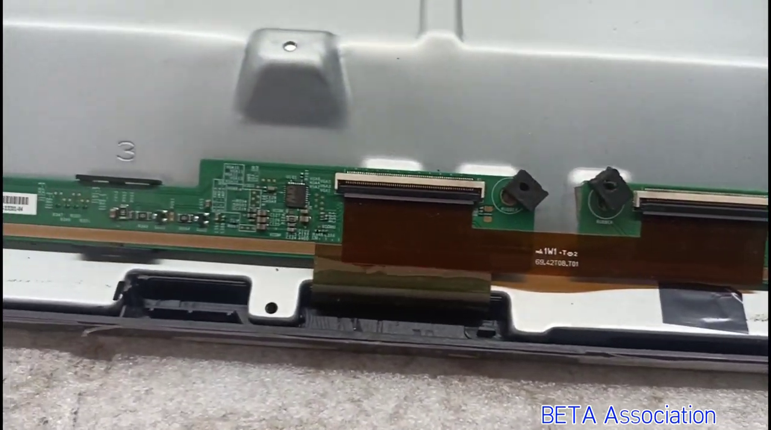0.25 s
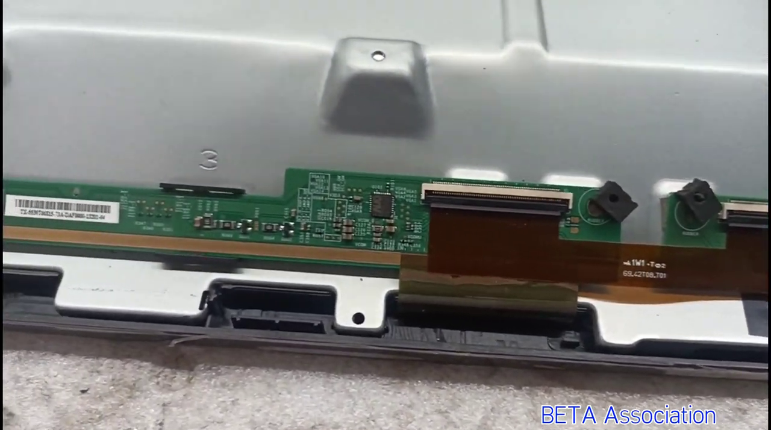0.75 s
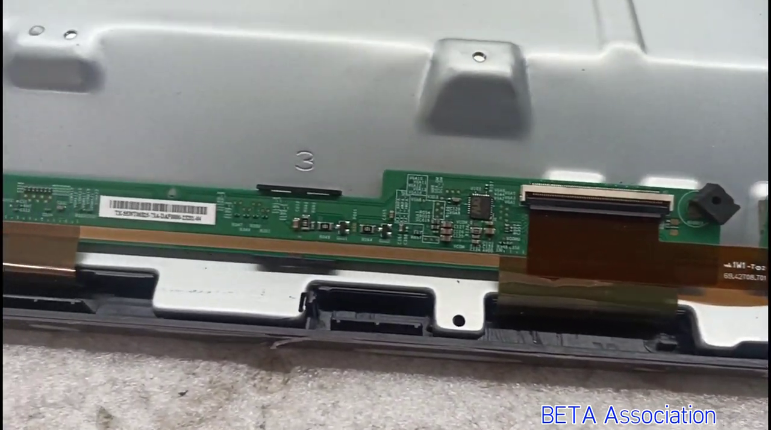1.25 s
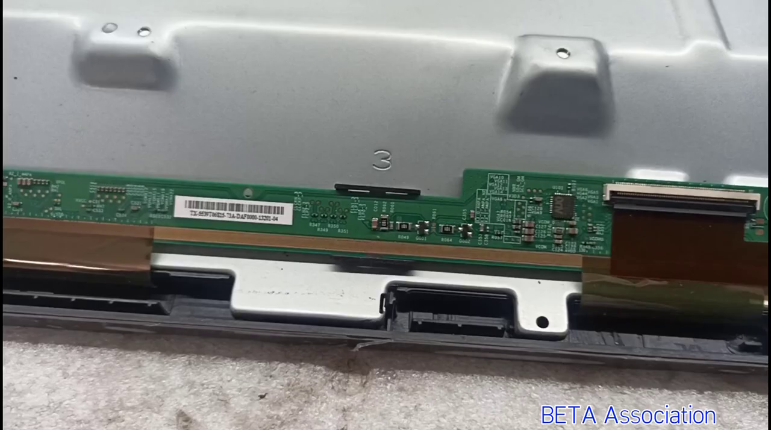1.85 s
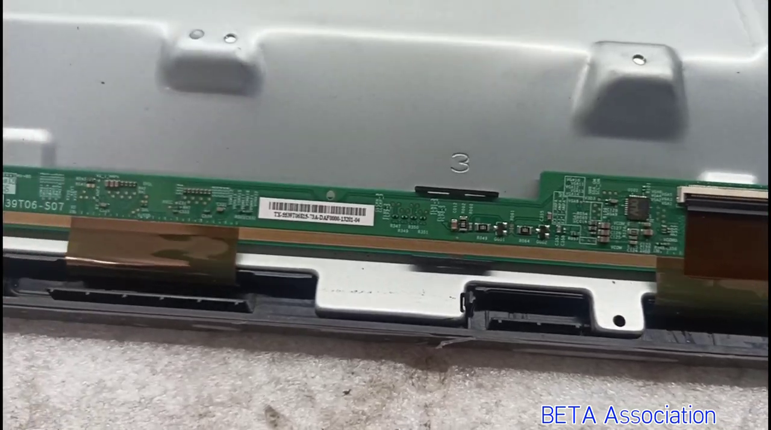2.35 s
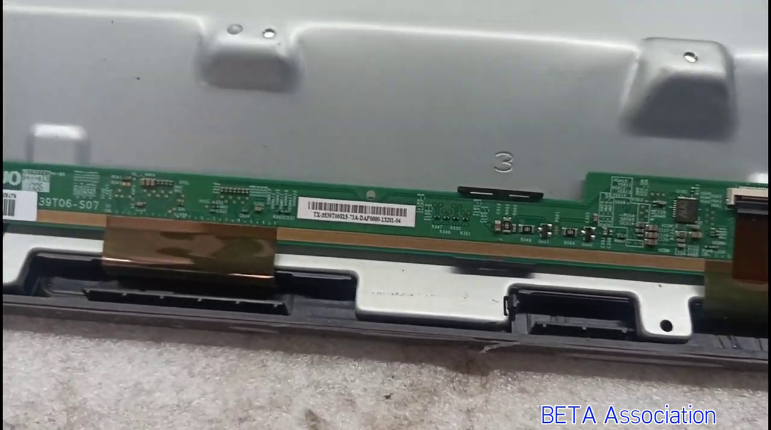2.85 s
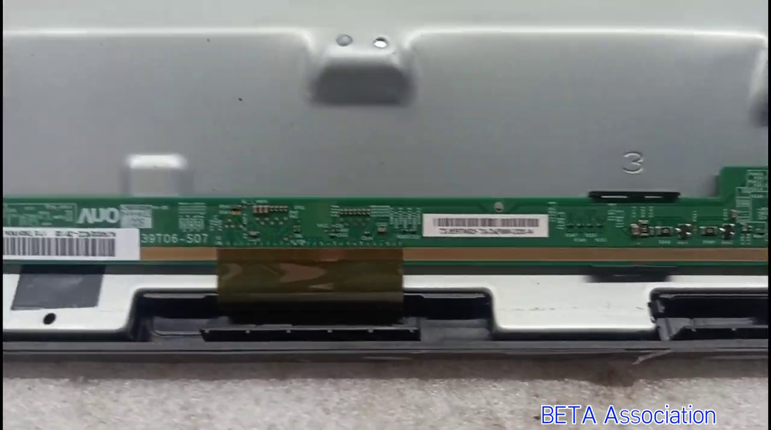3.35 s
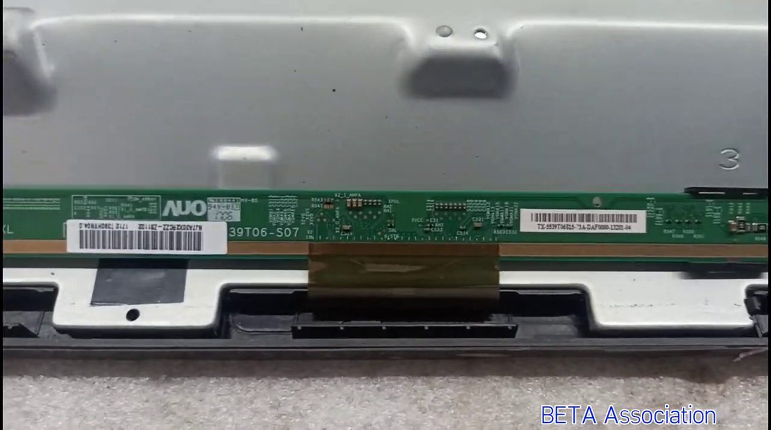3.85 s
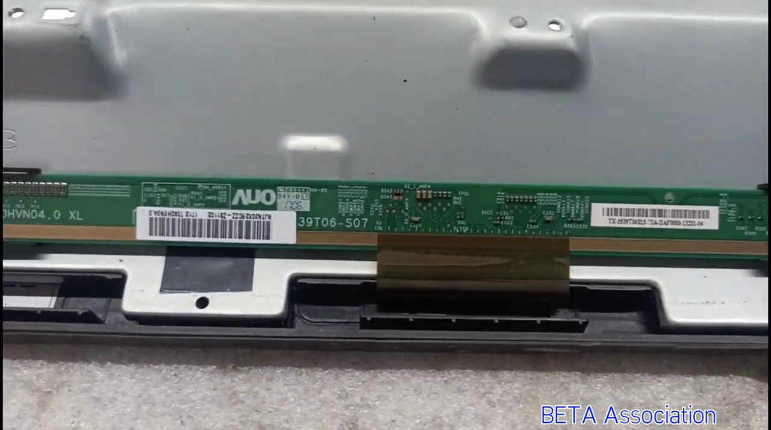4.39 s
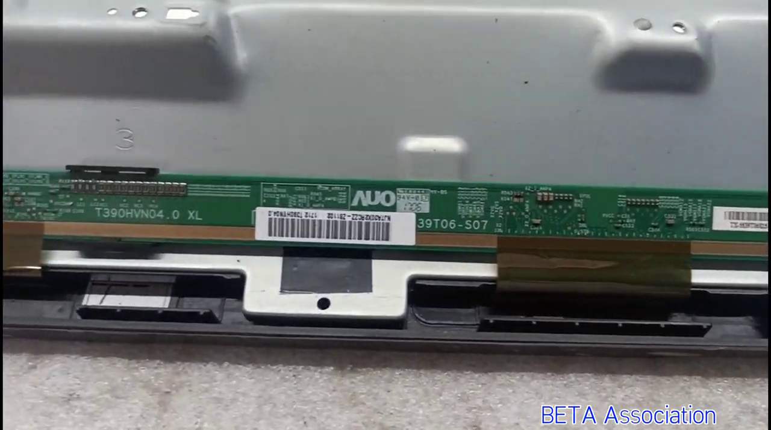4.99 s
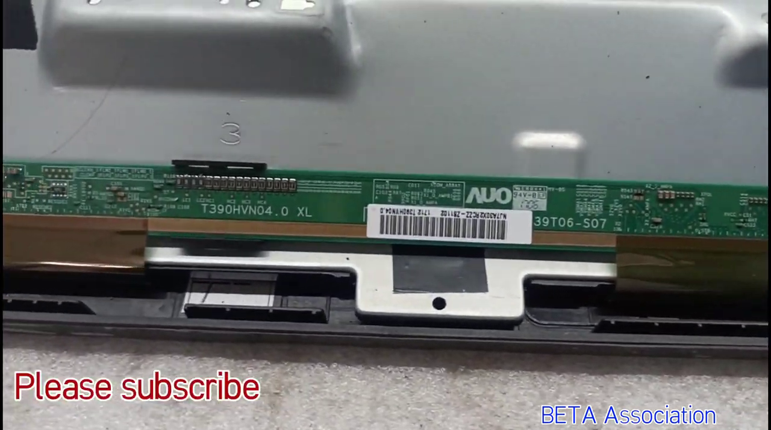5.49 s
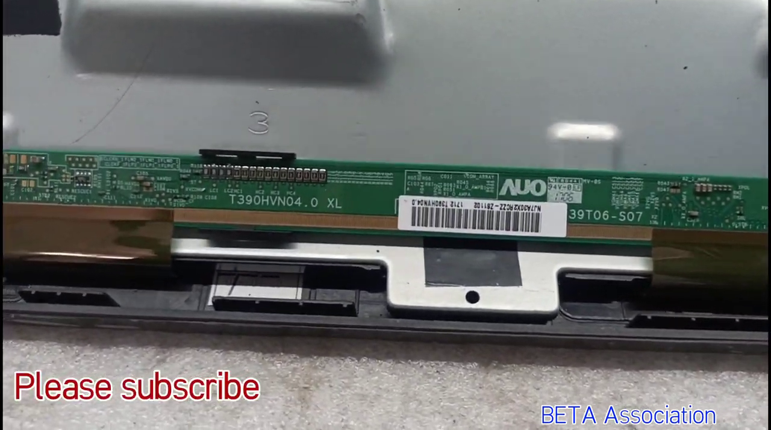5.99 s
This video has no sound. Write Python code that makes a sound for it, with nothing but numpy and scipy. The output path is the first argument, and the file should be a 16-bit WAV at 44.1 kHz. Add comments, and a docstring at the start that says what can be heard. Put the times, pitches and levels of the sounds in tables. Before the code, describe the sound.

In a quiet workshop, a heavy vehicle's low wavering drone comes from outside with dull roar and road rush, gradually drawing away. Within the first second a lighter vehicle passes, its tyre noise swelling and its motor note sinking slightly. Around three seconds something rustles close to the microphone with tiny ticks. Faint hiss fills the room, and one small soft tap comes near the end.

```python
"""A heavy engine drones past outside a quiet workshop and slowly draws away: sines on multiples of one
cycle rate swell and fade over a throbbing roar and road rush made of shaped noise.
A lighter vehicle passes early on, as a few sinking orders and tyre noise; a broad noise hiss fills the room.
Close by something rustles briefly (swells of grainy noise) and a few small ticks sound (damped rings)."""
import sys
import numpy as np
from scipy import signal
from scipy.fft import rfft, irfft, next_fast_len
from scipy.io import wavfile
from scipy.ndimage import uniform_filter1d, map_coordinates

SR = 44100
rng = np.random.default_rng(int(sys.argv[2]) if len(sys.argv) > 2 else 0)


def int16_out(signal):
    """Quantize to a 16-bit WAV file."""
    q = np.round(np.clip(np.atleast_2d(signal).T, -1, 1) * 32767)
    wavfile.write(sys.argv[1], SR, q.astype(np.int16))


N = 274743  # samples
TIME_S = np.arange(N) / SR


def amp(db):
    """Level to amplitude: 20 dB is a factor of ten."""
    return 10 ** (np.asarray(db) / 20)


def unit(x):
    """Normalisation to a root mean square of 1."""
    return x / np.sqrt(np.mean(x ** 2) + 1e-20)


def along(points, hz):
    """Interpolation of (f/Hz, value) points on a logarithmic frequency axis."""
    f, v = np.transpose(points)
    return np.interp(np.log(hz + 1), np.log(f + 1), v)


def curves(rows):
    """Linear interpolation in time: one value per sample for each column after t/s."""
    s, *columns = np.transpose(rows)
    return [np.interp(TIME_S, s, column) for column in columns]


def wobble(rate):
    """Band-limited random modulation: a smooth curve through `rate` random knots a second."""
    knots = rng.standard_normal(int(N * rate / SR) + 4)
    return map_coordinates(knots, [np.arange(N) * rate / SR])


def filtered(x, response):
    """Linear filtering: the spectrum of x times a response of frequency."""
    m = next_fast_len(N + 8192)  # zero padding
    return irfft(rfft(x, m) * response(np.fft.rfftfreq(m, 1 / SR)), m)[..., :N]


# Interchannel coherence of every noise: (f/Hz, left-right likeness)
LIKENESS = [(60, 0.87), (180, 0.99), (550, 0.76), (1650, 0.035), (4970, 0.01), (15000, 0.11)]


def noise(spectrum, patchy_db):
    """Partly coherent stereo noise of rms 1: spectral shaping, with random gain over time and frequency."""
    z = signal.stft(rng.standard_normal((2, N)), nperseg=512)[2]
    field = uniform_filter1d(rng.standard_normal(z.shape[1:]), size=6, axis=0)
    field = uniform_filter1d(field, size=12, axis=1)
    pair = signal.istft(z * amp(patchy_db * unit(field)), nperseg=512)[1][:, :N]
    ends = [(10, -120)] + spectrum + [(20000, -120)]

    def mid_side(hz):
        turn = np.arccos(np.clip(along(LIKENESS, hz), -1, 1)) / 2
        return amp(along(ends, hz)) * [np.cos(turn), np.sin(turn)]

    mid, side = filtered(pair, mid_side)
    return unit(np.array([mid + side, mid - side]))


def orders(rate_hz, multiples, levels_db):
    """Harmonic synthesis on one cycle rate; level and phase waver, the phase not quite alike left and right."""
    phase = 2 * np.pi * np.cumsum(rate_hz) / SR
    total = 0
    for k, db in zip(multiples, levels_db):
        drift = 0.17 * wobble(12) + 0.12 * np.outer([1, -1], wobble(2.93))  # radians
        drift = drift + rng.uniform(0, 2 * np.pi)
        total = total + np.sqrt(2) * amp(db + 0.61 * wobble(10)) * np.sin(k * phase + drift)
    return total


# Engine cycle rate: (t/s, f/Hz)
CYCLE_RATE = [(0, 26.23), (.2, 25.96), (.32, 25.24), (.6, 25.58), (.9, 26.03), (1.4, 26.35), (2.0, 26.28),
              (2.3, 25.94), (3.3, 25.99), (3.9, 25.94), (4.15, 25.53), (6.23, 25.4)]
# Order 5, which beats with order 6: (t/s, rms level/dB)
ORDER_5 = [(0.0, -39.5), (0.42, -41.5), (0.54, -56), (0.8, -44), (0.97, -54), (1.14, -40.5), (1.6, -40),
           (2.08, -40.5), (2.26, -61), (2.33, -49), (3.5, -39), (4.11, -58), (4.39, -43), (5.74, -58),
           (6.23, -55)]
# Order 6, the firing tone: (t/s, rms level/dB)
ORDER_6 = [(0.0, -49), (0.03, -29.5), (0.1, -42), (0.17, -32), (0.26, -28.5), (0.36, -28.5), (0.42, -37),
           (0.52, -28), (0.63, -34.5), (0.72, -31.5), (0.87, -26.5), (1.0, -29), (1.1, -33), (1.15, -42),
           (1.22, -37), (1.28, -34.5), (1.5, -31), (1.65, -33.5), (1.97, -29), (2.12, -35), (2.29, -29.5),
           (2.91, -38.5), (3.14, -59), (3.31, -34), (3.43, -46), (3.66, -37), (3.72, -38), (3.79, -34.5),
           (4.0, -39), (4.1, -36), (4.2, -45.5), (4.3, -39), (4.44, -38.5), (4.56, -43), (4.7, -37.5),
           (4.95, -43), (5.08, -47), (5.24, -50), (5.34, -39), (5.46, -50), (5.55, -40), (5.68, -45),
           (5.8, -43.5), (5.97, -46.5), (6.02, -65), (6.23, -49)]
# Orders 7 and 8: (t/s, rms level of 7/dB, rms level of 8/dB)
ORDERS_7_8 = [(0, -52, -61), (.25, -53, -49), (.45, -44, -53), (.8, -46, -48), (1, -44, -50),
              (1.2, -43.5, -52), (1.55, -45, -54), (1.8, -51, -63), (2.05, -42, -52), (2.2, -48, -47),
              (2.6, -49, -58), (2.85, -62, -48), (3.5, -63, -67), (3.8, -46, -52), (4, -46, -54),
              (4.1, -43, -44), (4.2, -44, -48), (4.32, -49, -39.5), (4.42, -50, -48), (4.52, -52, -40),
              (4.66, -53, -45), (4.88, -47, -45), (5.05, -45, -50), (5.3, -57, -67), (5.6, -52, -52),
              (6.23, -62, -55)]
# Weaker orders: (multiple, rms level at the start, before fading and swells/dB)
WEAK_ORDERS = [(3, -61.5), (4, -52), (9, -66), (10, -59.5), (11, -56.5), (12, -53), (13, -54), (16, -62),
               (18, -62)]
# A weak order stands out a while: (multiple, t/s, half width/s, gain/dB)
ORDER_SWELLS = [(4, 2.89, 0.16, 10), (10, 1.35, 0.21, 8), (10, 5.08, 0.17, 15), (11, 3.1, 0.17, 10.5),
                (11, 3.55, .25, 10), (13, 3.3, .3, 8), (13, 5.76, 0.17, 12), (16, .95, .2, 17),
                (16, 3.92, 0.18, 15), (18, 4.35, 0.14, 9), (18, 5.1, 0.17, 18), (18, 7.1, 0.16, 14)]
AWAY_DB_PER_S = -0.58  # the weak orders sink as distance grows
FADING_DB, FLUTTER_DB = 0.7, 1.5  # depths of their slow and faster random fading


def engine():
    """Harmonic shaft orders with multipath fading: paths around buildings make each fade on its own."""
    weak_db = {}
    for k, db in WEAK_ORDERS:
        fading_db = FADING_DB * wobble(2.54) + FLUTTER_DB * wobble(7)
        weak_db[round(k)] = db + AWAY_DB_PER_S * TIME_S + fading_db
    for k, s, width, gain_db in ORDER_SWELLS:
        weak_db[round(k)] = weak_db[round(k)] + gain_db * np.exp(-((TIME_S - s) / width) ** 2)
    levels_db = curves(ORDER_5) + curves(ORDER_6) + curves(ORDERS_7_8) + list(weak_db.values())
    return orders(curves(CYCLE_RATE)[0], [5, 6, 7, 8, *weak_db], levels_db)


# Multiples of the lighter vehicle's cycle rate that sound: (multiple)
MOTOR_ORDERS = [2, 7, 8, 9]
# Its motor: (t/s, then the rms level of each of those orders/dB)
MOTOR_LEVELS = [(0, -56, -59, -62, -51), (.2, -53, -62, -69, -55), (.4, -49, -47.5, -54, -44.5),
                (.6, -45, -46, -50, -42.5), (.82, -48, -40, -54, -42), (1, -54, -57, -49, -40.5),
                (1.2, -51, -41, -56, -51.5), (1.4, -57, -46, -52, -41.5), (1.6, -64, -54, -49, -42),
                (1.8, -64, -43.5, -54, -46), (2, -68, -65, -51, -52.5), (2.25, -80, -63, -49, -46.5),
                (2.55, -80, -70, -48, -58), (3, -92, -92, -68, -73)]
# Its tyre noise: (t/s, level/dB)
TYRE_LEVEL = [(0, -51), (.15, -40.5), (.4, -37), (.85, -38), (.95, -42.5), (1.2, -42.5), (1.8, -47.5),
              (2.6, -71)]
# Colour of the tyre noise: (f/Hz, relative density/dB per Hz)
TYRE_SPECTRUM = [(700, -32), (960, 2), (1060, -20), (1170, 4), (1290, -8), (1520, 0.5), (1780, -9.5),
                 (1950, -4), (2050, -9.5), (2350, -4.5), (2800, -9.5), (3250, -9), (3600, -13), (5000, -27)]
PASS_S, PASS_HZ = 0.6, 41.9  # nearest moment, cycle rate then
SINK_HZ, SINK_S = 0.8, 0.396  # swing of the cycle rate either side, its time scale
NOTE_FADING_DB = 2.2


def passer():
    """Doppler shift: the lighter vehicle's motor orders sink in pitch as it goes by, over its tyre noise."""
    rate_hz = PASS_HZ - SINK_HZ * np.tanh((TIME_S - PASS_S) / SINK_S)
    levels_db = [db + NOTE_FADING_DB * wobble(7) for db in curves(MOTOR_LEVELS)]
    motor = orders(rate_hz, MOTOR_ORDERS, levels_db)
    tyre_db = curves(TYRE_LEVEL)[0] + 1.1 * wobble(14)
    return motor + amp(tyre_db) * noise(TYRE_SPECTRUM, patchy_db=1.4)


# Roar and road rush: (t/s, roar level/dB, rush level/dB)
ROAR_RUSH_LEVELS = [(0, -41.5, -38.5), (.45, -37.5, -36.5), (1, -37, -37), (1.4, -39, -39),
                    (2.5, -40.5, -40), (3.2, -39.5, -39), (5, -40, -40.5), (6.23, -40.5, -41)]
# Hiss: (t/s, level/dB)
HISS_LEVEL = [(0, -46.5), (.5, -41.5), (.75, -40.5), (1.3, -43), (2, -46.5), (2.35, -46), (2.8, -46),
              (3.15, -41.5), (3.55, -41.5), (3.92, -40), (4.42, -42), (5.3, -46), (5.67, -46), (5.9, -49.5),
              (6.23, -49.5)]
# Colours of the exhaust roar, tyre rush, hiss and airy top, each: (f/Hz, relative density/dB per Hz)
ROAR_SPECTRUM = [(15, -35), (30, -26), (45, -26.5), (80, -11), (115, -9.5), (145, -10), (170, -9),
                 (205, -4), (225, -13), (250, -7.5), (300, -4.5), (450, -5), (550, -16), (800, -31)]
RUSH_SPECTRUM = [(300, -28), (520, -5.5), (650, -0.5), (1000, -3.5), (1350, -1.5), (1600, -3.5), (1800, -8),
                 (2100, -5.5), (2500, -12), (3500, -12.5)]
HISS_SPECTRUM = [(1500, -9), (2600, -5), (4650, 1.5), (4900, -6.5), (6000, -9.5), (6300, -3.5),
                 (7500, -6.5), (7800, -8.5), (8600, -10.5), (11000, -30.5)]
AIR_SPECTRUM = [(9000, -32), (11500, -4), (13500, -5.5), (15500, -10)]
THROB_DB, WAVER_DB = 1.2, 0.8  # the roar throbs once an engine cycle and wavers at random
# The airy top: mean level at the start, swing relative to the hiss, steady gain
AIR_DB, AIR_GROWS, AIR_DB_PER_S = -60.5, 1.24, 0.32


def traffic():
    """Amplitude-modulated broadband noise: throbbing exhaust roar, tyre rush, far hiss and its airy top."""
    roar_db, rush_db = curves(ROAR_RUSH_LEVELS)
    hiss_db = curves(HISS_LEVEL)[0]
    air_db = AIR_DB + AIR_DB_PER_S * TIME_S + AIR_GROWS * (hiss_db - hiss_db.mean())
    flutter = wobble(8)  # shared by rush, hiss and air
    cycle_phase = 2 * np.pi * np.cumsum(curves(CYCLE_RATE)[0]) / SR
    throb_db = THROB_DB * np.sin(cycle_phase + 1.5 * wobble(3.03))
    throbbing = amp(throb_db + WAVER_DB * wobble(14)) * noise(ROAR_SPECTRUM, patchy_db=1.1)
    roar = unit(throbbing) * amp(roar_db)
    rush = amp(rush_db + 0.15 * flutter) * noise(RUSH_SPECTRUM, patchy_db=1.08)
    hiss = amp(hiss_db + 0.79 * flutter) * noise(HISS_SPECTRUM, patchy_db=1.25)
    air = amp(air_db + 0.6 * flutter) * noise(AIR_SPECTRUM, patchy_db=2.5)
    return roar + rush + hiss + air


# Rustles: (t/s, rise/s, fall/s, level before the grain/dB, left minus right/dB, scrape over the rustle/dB)
RUSTLE_SWELLS = [(2.44, 0.017, 0.035, -48, -12, -12), (2.669, 0.029, 0.05, -42, 1.5, 0),
                 (3.0, 0.011, 0.026, -37, 5, -11), (3.044, .02, 0.02, -39, 3, -20),
                 (3.11, 0.049, 0.058, -39.5, 0, -8), (3.15, 0.0099, 0.0077, -40.5, 1, -8),
                 (3.172, 0.018, 0.046, -35, 1, -9), (3.225, 0.048, 0.059, -46, -7, -6),
                 (4.02, 0.041, 0.075, -51, -9, -12), (4.52, 0.058, 0.062, -47, -7, -9),
                 (5.57, 0.027, .05, -55, -8, -9), (5.8, 0.033, 0.052, -48.5, 0, -4)]
# Colour of the rustle: (f/Hz, relative density/dB per Hz)
RUSTLE_SPECTRUM = [(800, -6), (1400, -6), (2200, -6.5), (3000, -6), (3600, -5.5), (4550, -2.5),
                   (5000, -11.5), (6500, -6), (8400, -10), (12000, -13), (15500, -15)]
# Colour of its thin part: (f/Hz, relative density/dB per Hz)
SCRAPE_SPECTRUM = [(5000, -30), (6200, -0.5), (7000, -1.5), (8000, -5), (9000, -25)]


def rustle():
    """Friction noise: short swells of grainy noise, each with a thinner scrape in it."""
    swell, thin = np.zeros((2, N)), np.zeros((2, N))
    for s, rise, fall, db, pan_db, scrape_db in RUSTLE_SWELLS:
        side_db = np.array([[pan_db], [-pan_db]]) / 2
        bump = np.exp(-((TIME_S - s) / np.where(TIME_S < s, rise, fall)) ** 2)
        shape = amp(db + side_db) * bump
        swell = swell + shape
        thin = thin + amp(scrape_db) * shape
    grain = amp(1.1 * wobble(150) + 1.8 * wobble(600))
    body = swell * noise(RUSTLE_SPECTRUM, patchy_db=1.5)
    scrape = thin * noise(SCRAPE_SPECTRUM, patchy_db=1.5)
    return grain * (body + scrape)


# Ticks: (t/s, ring level before decay and onset/dB, f/Hz, 60 dB decay time/s, rise/s)
TICK_RINGS = [(3.0465, -14.5, 2785, 0.016, 0.004), (3.157, -28, 4650, .02, 0.0018),
              (3.165, -21, 4600, 0.025, 0.0027), (3.179, -29, 4700, .02, .002),
              (5.5158, -5.5, 930, 0.0045, 0.0011)]


def ticks():
    """Damped free vibration: each tiny contact is one decaying ring that starts with a pull."""
    out, t = np.zeros(N + SR), np.arange(SR // 10) / SR
    for s, db, hz, t60, rise in TICK_RINGS:
        decay = amp(db - 60 * t / t60)
        onset = 1 - np.exp(-t / rise)
        start = round(s * SR)
        out[start:start + len(t)] -= decay * np.sin(2 * np.pi * hz * t) * onset  # negative: a pull
    return out[:N]


def scene():
    """Superposition: the pressures of all sources add."""
    return engine() + passer() + traffic() + rustle() + ticks()


# Colour difference of the two ports: (f/Hz, left minus right/dB)
PORT_TILT = [(60, 0.3), (110, -0.5), (200, 0), (380, 0), (700, 0.5), (1290, -0.5), (2380, -4.5), (4400, -5),
             (8120, 1), (15000, -2)]
# A nearly empty treble band: (f/Hz, gain/dB)
TREBLE_GAP = [(8500, 0), (8650, -14.5), (10200, -18), (11000, -44), (11560, -50), (11600, 0)]
TOP_HZ = 15500  # band limit


def record(dry):
    """Two ports of different colour and a band limit; besides, little sounds between 8.5 and 11.6 kHz."""
    def response(hz):
        ports_db = np.outer([0.5, -0.5], along(PORT_TILT, hz)) + along(TREBLE_GAP, hz)
        return amp(ports_db) * (hz < TOP_HZ)

    return filtered(dry, response)


dry = scene()
out = record(dry)
int16_out(out)
```